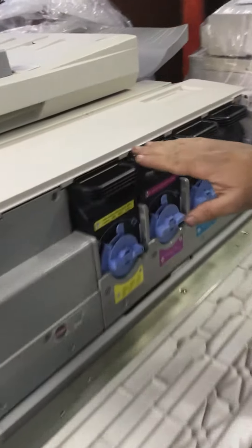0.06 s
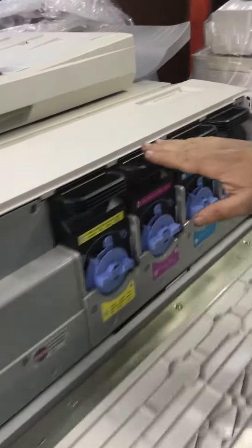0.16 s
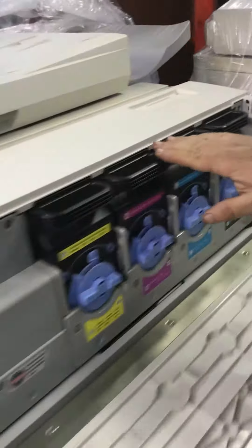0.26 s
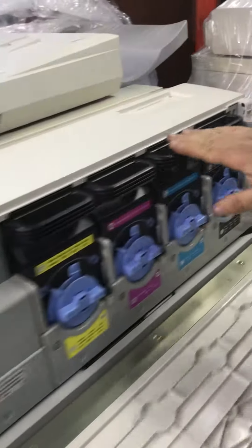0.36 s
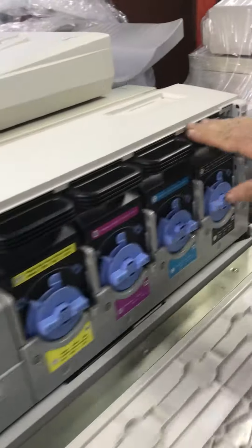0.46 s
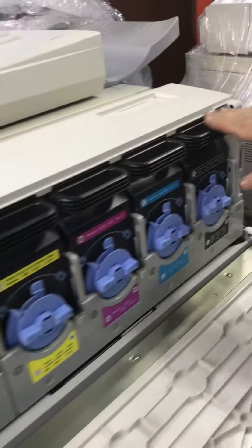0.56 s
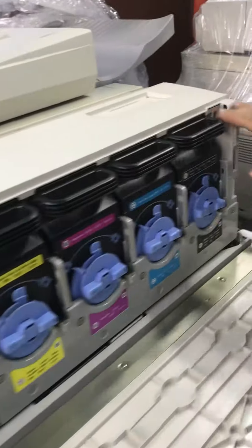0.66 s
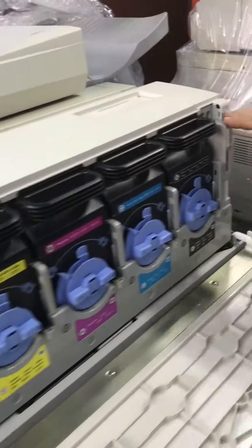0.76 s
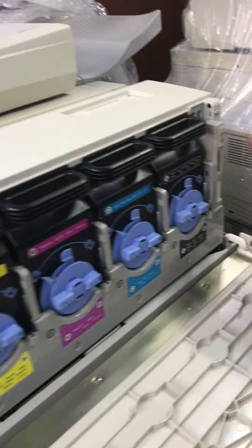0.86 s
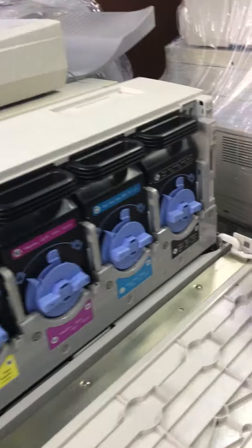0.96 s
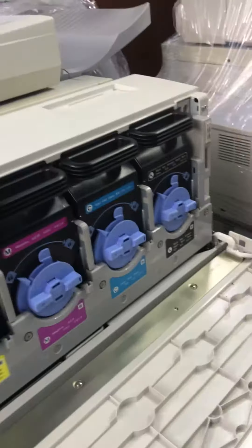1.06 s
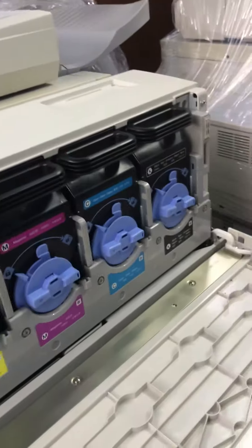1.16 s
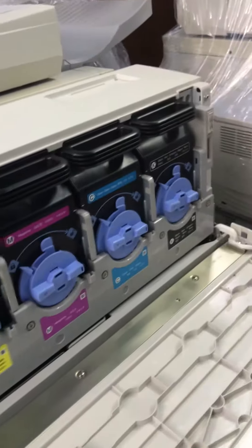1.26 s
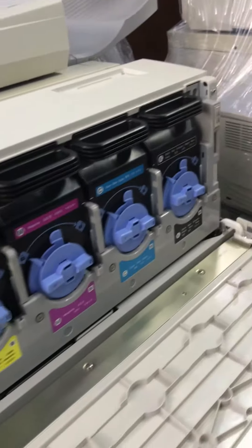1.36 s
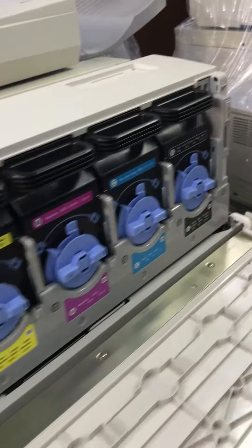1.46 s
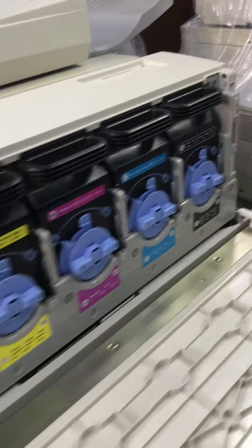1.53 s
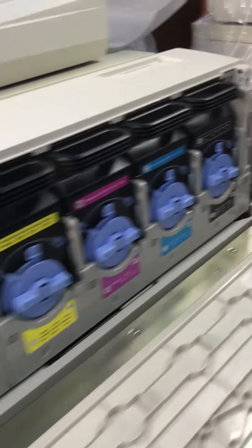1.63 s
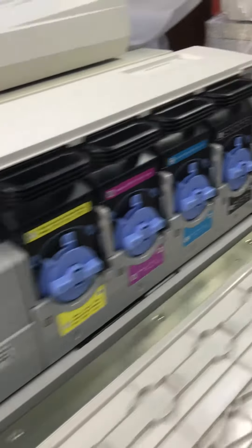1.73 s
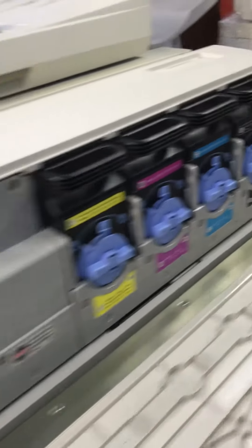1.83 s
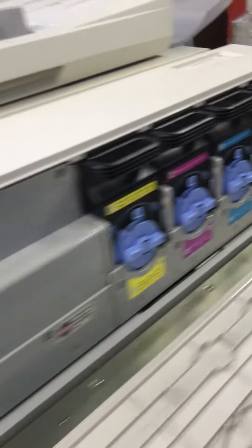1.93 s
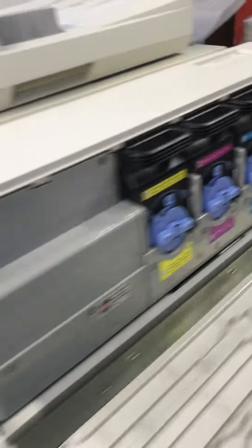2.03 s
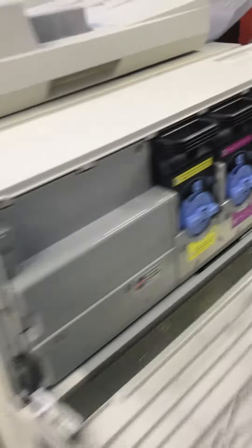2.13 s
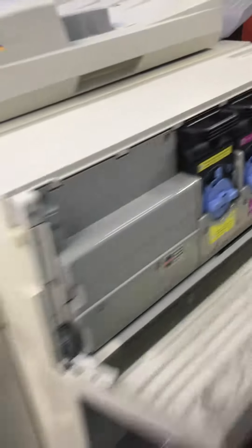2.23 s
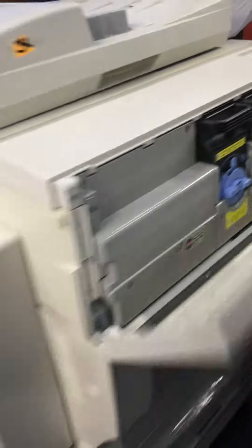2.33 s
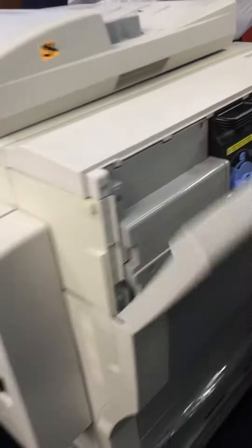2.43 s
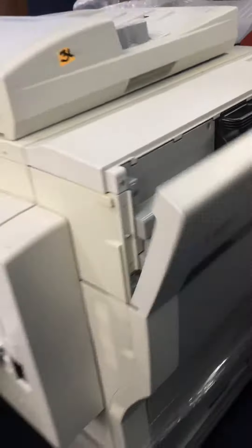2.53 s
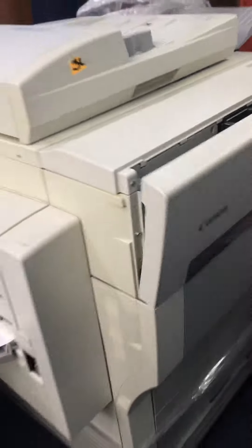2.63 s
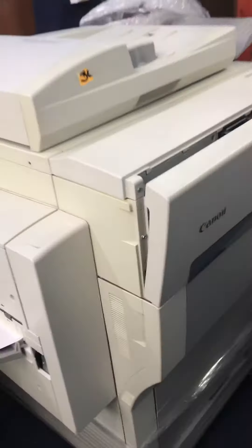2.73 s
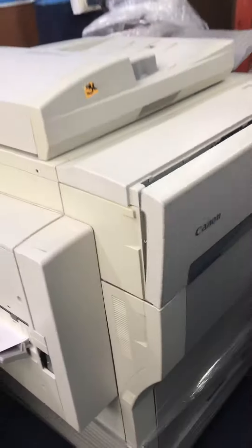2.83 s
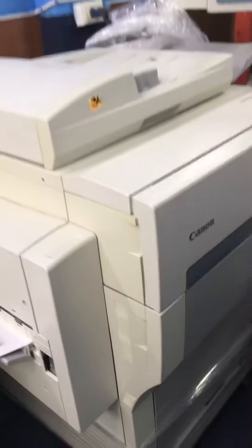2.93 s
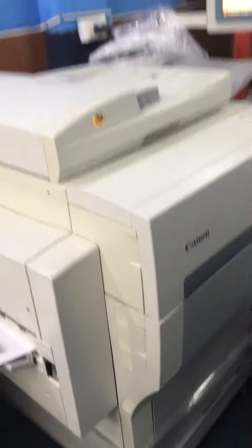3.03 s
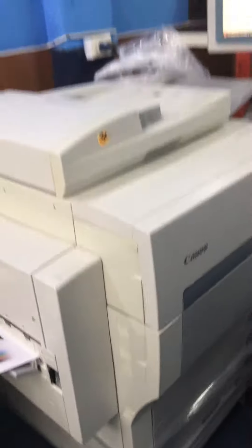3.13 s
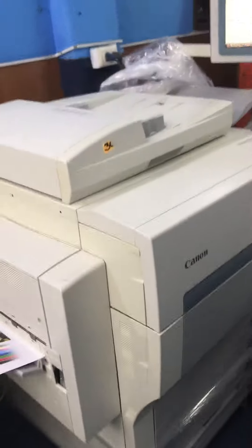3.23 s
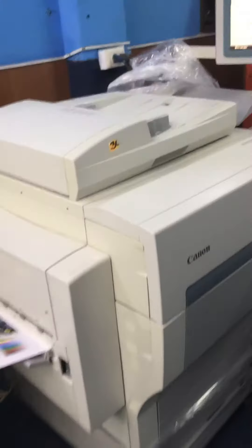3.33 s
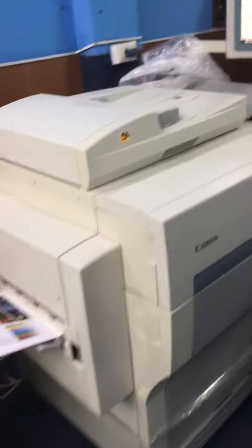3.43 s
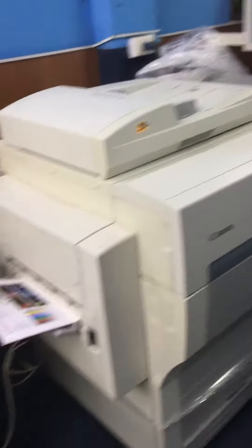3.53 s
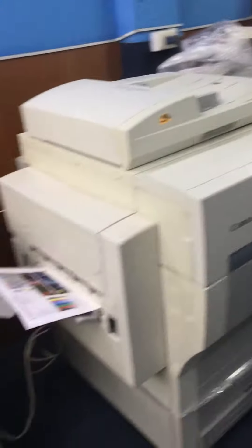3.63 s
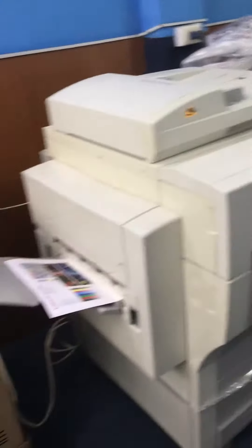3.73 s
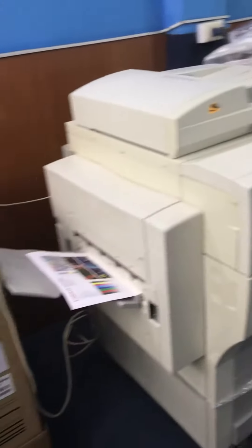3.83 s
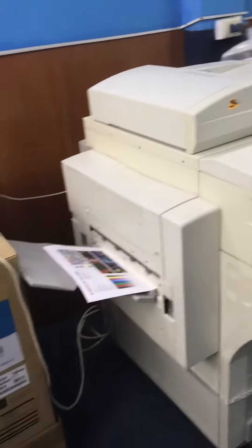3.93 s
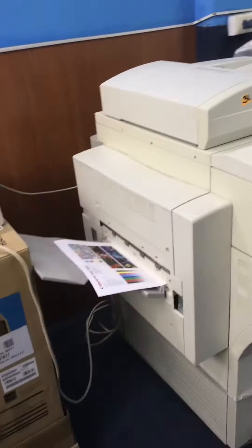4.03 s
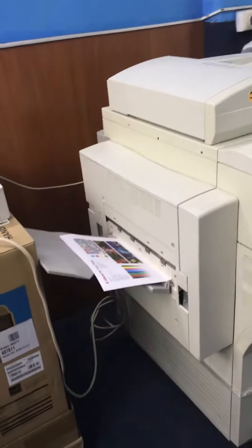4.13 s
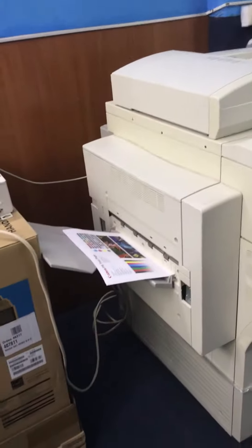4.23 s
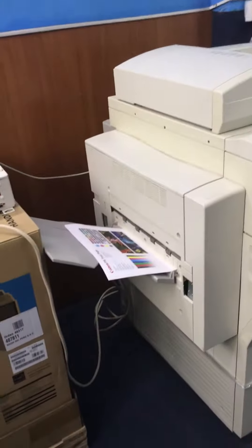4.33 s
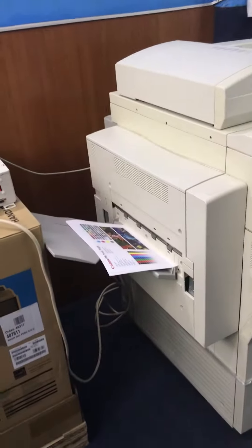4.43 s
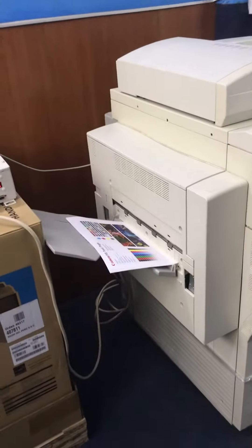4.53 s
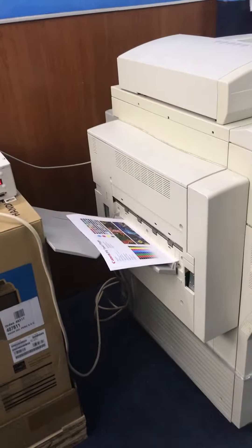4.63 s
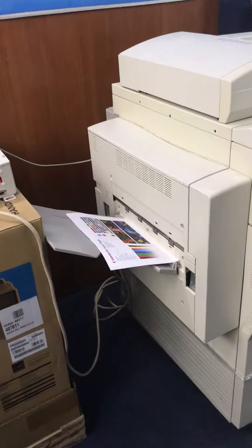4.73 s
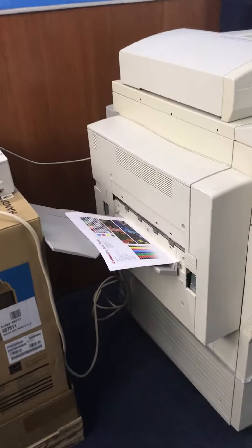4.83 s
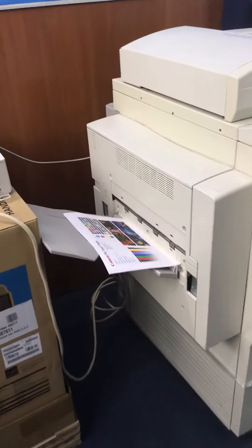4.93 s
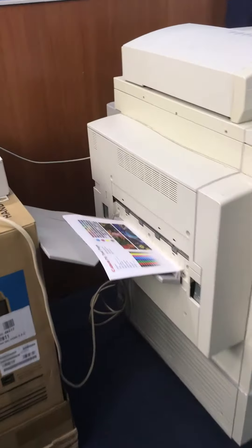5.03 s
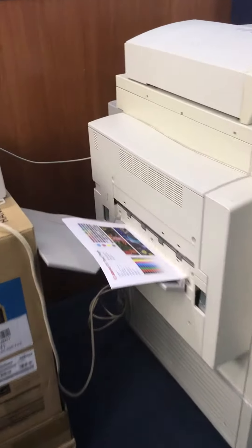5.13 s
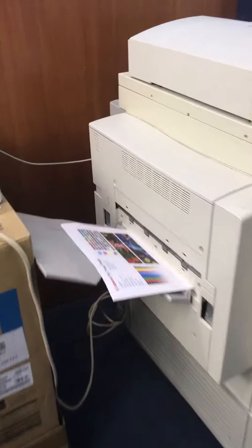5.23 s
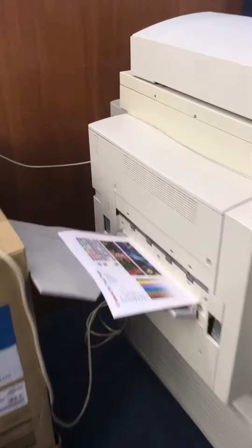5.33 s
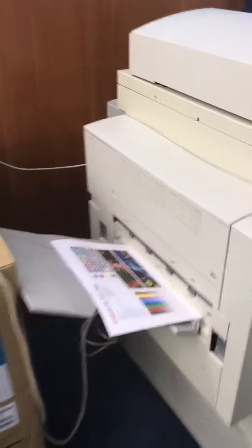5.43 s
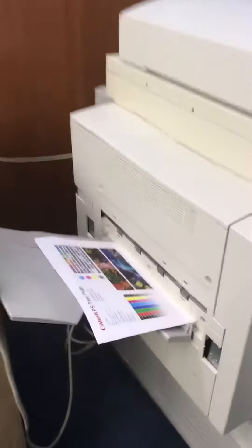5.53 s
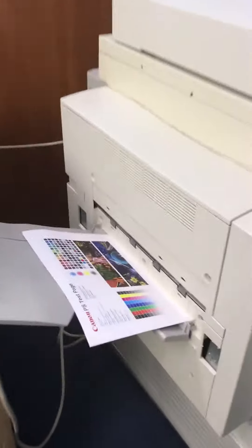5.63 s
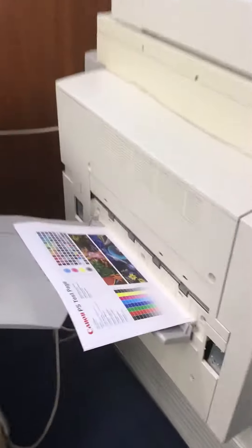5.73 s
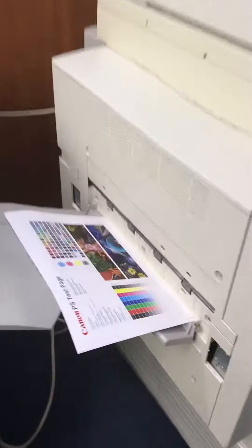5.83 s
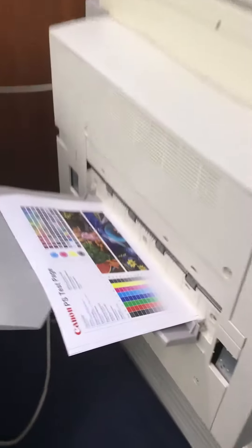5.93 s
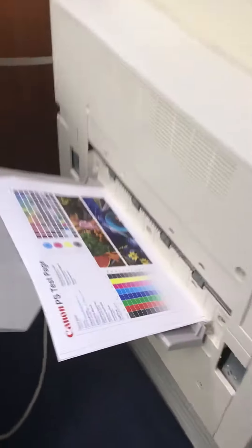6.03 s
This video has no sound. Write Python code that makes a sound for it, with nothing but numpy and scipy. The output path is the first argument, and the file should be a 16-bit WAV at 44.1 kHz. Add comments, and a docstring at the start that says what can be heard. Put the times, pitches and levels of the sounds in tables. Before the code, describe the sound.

Steady fan rush and motor whine from a large printer, with one loud plastic door clack and a few light clicks.

```python
"""Office copier in a small room

Fans rush and hum, rollers hiss, the cabinet drones, motors and gear trains whine. A hand slides off
the toner bay; the plastic front door is knocked, judders on its hinge and is slapped shut on its latch.
The listener moves to the output tray through the tones' standing waves while the paper path clicks."""
import sys
import numpy as np
from scipy import signal
from scipy.fft import rfft, irfft
from scipy.io import wavfile

SR = 44100
rng = np.random.default_rng(int(sys.argv[2]) if len(sys.argv) > 2 else 0)


def to_wav(s):
    """Save 16-bit WAV."""
    ch = np.atleast_2d(s).T  # columns
    pcm = np.round(np.clip(ch, -1, 1) * 32767)  # PCM
    wavfile.write(sys.argv[1], SR, pcm.astype(np.int16))


N = 268569
T = np.arange(N) / SR
RING_T = T[:SR // 2]
MESH_HZ, TWIN_MESH_HZ = 448.3, 445.7


def undb(db):
    """Decibels to gain."""
    return 10 ** (np.asarray(db) / 20)


def unit(x):
    """Scale to rms 1."""
    return x / np.sqrt(np.mean(x ** 2))


def unit_attack(x):
    """Scale to rms 1 over the first 10 ms."""
    return x / np.sqrt(np.mean(x[:SR // 100] ** 2))


def swell(at_s, width_s):
    """Bell curve of height 1."""
    return np.exp(-2 * ((T - at_s) / width_s) ** 2)


def fade(t60_s):
    """Exponential decay."""
    return np.exp(-np.log(1000) * RING_T / t60_s)


def walk(rate_hz):
    """Smooth random drift of rms 1."""
    size = 4096
    hz = np.arange(size // 2 + 1) * SR / N
    coarse = irfft(rfft(rng.standard_normal(size)) * np.exp(-(hz / rate_hz) ** 2), size)
    return np.interp(T, np.linspace(0, T[-1], size), unit(coarse))


def noise(spectrum, peaks=(), size=N):
    """Noise of rms 1: a smooth spectrum plus resonances."""
    hz = np.arange(size // 2 + 1) * SR / size + 1
    knots_hz, knots_db = np.transpose(spectrum)
    shape_db = np.interp(np.log(hz), np.log(knots_hz), knots_db)
    for centre_hz, width_hz, peak_db in peaks:
        shape_db += peak_db / (1 + (2 * (hz - centre_hz) / width_hz) ** 2)
    return unit(irfft(rfft(rng.standard_normal(size)) * undb(shape_db), size))


def band(x, low_hz, high_hz):
    """Causal band-pass."""
    return signal.sosfilt(signal.butter(2, [low_hz, high_hz], "band", fs=SR, output="sos"), x)


def modes(rows):
    """Struck modes of random polarity, attack rms 1."""
    ring = 0
    for hz, db, t60_s in rows:
        ring += rng.choice([-1, 1]) * undb(db) * fade(t60_s) * np.sin(2 * np.pi * hz * RING_T)
    return unit_attack(ring)


def add(out, at_s, x):
    """Mix x into out."""
    start = int(at_s * SR)
    out[start:start + len(x)] += x[:N - start]


def tone(hz, scatter):
    """Direct tone plus reflections that shift as the listener moves; rms 1."""
    phase = 2 * np.pi * np.cumsum(hz) / SR
    return unit((1 + scatter * walk(5.1)) * np.cos(phase) + scatter * walk(5.8) * np.sin(phase))


def reflected_tone(hz):
    """Tone heard by reflections alone, dropping out at the nodes; rms 1."""
    phase = 2 * np.pi * np.cumsum(hz) / SR
    return unit(walk(7) * np.cos(phase) + walk(7) * np.sin(phase))


# t/s, position (0 toner bay, 1 output tray)
LISTENER_PATH = [(1.8, 0), (2.7, 1), (3.8, 1)]

def heard(bay_db, tray_db, lean_db=0):
    """Source gain as the listener goes from bay to tray, then leans in."""
    lean_start_s, lean_takes_s = 5.04, 0.75
    position = np.interp(T, *np.transpose(LISTENER_PATH))
    lean = np.clip((T - lean_start_s) / lean_takes_s, 0, 1)
    return undb(bay_db + (tray_db - bay_db) * position + lean_db * lean)


# f/Hz, density/dB
RUSH_SPECTRUM = [(15, -40), (26, 5), (100, -2.5), (200, 0), (380, -5.5), (600, -3.5), (850, -6),
                 (1300, -6.5), (1800, -14), (2500, -19), (4000, -26.5), (8000, -51)]

def fan_rush():
    """Turbulent air from the fans."""
    return noise(RUSH_SPECTRUM) * heard(-52, -50.5, lean_db=3.5) * undb(0.45 * walk(10.4))


# f/Hz, density/dB
ROLLER_SPECTRUM = [(1500, -0.5), (3000, 7), (4200, 4.5), (6000, 4.5), (7500, 1.5), (9300, 0), (12000, -5.5),
                   (15700, -5.5)]
# f/Hz, width/Hz, gain/dB
ROLLER_RESONANCES = [(3193, 91, 14.7), (5600, 195, 12), (8480, 300, 9.9)]

def roller_hiss():
    """Rollers rub; each gear tooth partly repeats the last, bunching the hiss at the mesh overtones."""
    hz = np.arange(N // 2 + 1) * SR / N
    comb_db = 0.7 * np.cos(2 * np.pi * hz / MESH_HZ)
    rub = noise(ROLLER_SPECTRUM, ROLLER_RESONANCES)
    hiss = unit(irfft(rfft(rub) * undb(comb_db), N))
    return hiss * heard(-59, -55.5, lean_db=3) * undb(0.98 * walk(27))


# t/s, depth/dB, width/s
BLADE_NODES = [(1.05, 8.5, 1.23), (3.55, 5.5, 0.68), (5, 10, 0.24)]

def fan_blades():
    """Blade tone, dipping as the listener crosses nodes of its standing wave."""
    pitch_hz = 636.3 * (1 + 0.0043 * walk(17.2))
    dip_db = sum(db * swell(at_s, width_s) for at_s, db, width_s in BLADE_NODES)
    return tone(pitch_hz, scatter=0.15) * heard(-52, -53.5, lean_db=1.5) * undb(-dip_db)


# t/s, gain/dB, width/s
LOW_SWELLS_AND_THUMPS = [(0.167, 10, 0.096), (2.806, 8, 0.3), (3.08, 12.5, 0.056), (4.08, 6, 0.22),
                         (4.502, 9.5, 0.16), (5.256, 14.5, 0.049), (5.61, 6, .2)]

def cabinet_drone():
    """Low cabinet drone that wavers and swells, with the door's boom and a footfall or handling thump."""
    pitch_hz = 63.3 + 2.59 * walk(14.8)
    boost_db = sum(db * swell(at_s, width_s) for at_s, db, width_s in LOW_SWELLS_AND_THUMPS)
    drone = tone(pitch_hz, scatter=0.16) * heard(-52.5, -53.5, lean_db=11.5)
    return drone * undb(boost_db + 1.6 * walk(8.6))


# f/Hz, bay level/dB, tray level/dB
HUM_LINES = [(122.8, -60, -60), (171.5, -62.5, -75), (232.7, -63, -60), (282, -65, -76), (313.3, -69, -63),
             (566, -60, -67), (760, -72, -69.5), (920, -68, -68), (1288, -71, -98), (1386, -111, -66),
             (1545, -72, -67.5), (1760, -86, -72), (2240, -74, -78)]

def hums():
    """Steady tones of fans and drives."""
    return sum(heard(bay_db, tray_db) * tone(hz * (1 + 0.00218 * walk(11.3)), scatter=0.36)
               for hz, bay_db, tray_db in HUM_LINES)


# t/s, f/Hz, gain/dB, width/s
ANTINODES = [(0.217, 2680, 7, 0.16), (0.96, 3130, 4.5, 0.17), (1.92, 3130, 8, 0.17),
             (2.358, 4483, 12.5, 0.085), (4.104, 2680, 3.5, 0.14), (4.846, 3130, 8.5, .13),
             (5.47, 2680, 5.5, 0.15), (5.476, 4931, 9, .08), (5.85, 8070, 5, 0.15), (6.002, 4931, 4, .08)]

def flare(line_hz, reach_hz=180):
    """Gain of a motor or gear line as the listener crosses its antinodes."""
    return undb(sum(db * swell(at_s, width_s) for at_s, hz, db, width_s in ANTINODES
                    if abs(line_hz - hz) < reach_hz))


# f/Hz, relative bay level/dB, relative tray level/dB
MOTOR_LINES = [(2639, -63, -62), (2663, -64.5, -58.5), (2722, -63, -64.5), (3089, -62, -60.5),
               (3166, -63.5, -71), (3146, -65, -65), (3520, -71, -71.5), (3580, -70.5, -85)]

def motor_whine():
    """Close lines beat; each swells and fades as the listener moves."""
    whine = 0
    for hz, bay_db, tray_db in MOTOR_LINES:
        line = tone(hz * (1 + 0.00161 * walk(35.6)), scatter=0.6)
        waver_db = 1.3 * walk(2.5)
        whine += heard(bay_db, tray_db) * flare(hz) * unit(line * undb(waver_db))
    return whine * heard(-2, -5, lean_db=3)


# harmonic, relative level/dB
MESH_OVERTONES = [(9, -76.5), (10, -67), (11, -64.5), (12, -65.5), (13, -67.5), (14, -73), (15, -77),
                  (16, -79), (17, -94), (18, -66), (19, -81), (20, -87), (21, -71), (22, -97), (23, -73),
                  (24, -78), (26, -81), (34, -83)]
# harmonic, drop at the bay/dB
TRAY_SIDE_OVERTONES = [(11, 6.5), (18, 13), (21, 15), (23, 21)]

def gear_trains():
    """Two nearly matched trains mesh: a comb of overtones each, fluttering with its speed."""
    harmonics, levels_db = np.transpose(MESH_OVERTONES)
    bay_drop_db = dict(TRAY_SIDE_OVERTONES)
    gears = 0
    for mesh_hz, train_db in [(MESH_HZ, 0), (TWIN_MESH_HZ, -8)]:
        speed = 1 + 0.0007 * walk(5) + 0.0006 * walk(40)
        for k in range(9, 35):
            gain = undb(np.interp(k, harmonics, levels_db) + train_db)
            place_gain = heard(-bay_drop_db.get(k, 0), 0) * flare(k * mesh_hz)
            gears += gain * place_gain * reflected_tone(k * mesh_hz * speed)
    return gears * heard(-1.4, -1, lean_db=2)


# f/Hz, density/dB
FINGER_SPECTRUM = [(2000, -24), (4000, -0.5), (7000, 3), (9200, 5), (11000, 1), (14500, 2), (16000, -8)]

def hand_slide():
    """Fingers catch and slip on textured plastic: an uneven high hiss that fades as they lift."""
    lift_s, release_s, level_db = 0.68, 0.23, -58.5
    rub = noise(FINGER_SPECTRUM)
    scrapes = 0
    for low_hz, high_hz in [(2000, 7000), (7000, 11000), (11000, 16500)]:
        scrapes += band(rub, low_hz, high_hz) * undb(2.2 * walk(18))
    contact = np.clip(1 - (T - lift_s) / release_s, 0, 1)
    return unit(scrapes) * contact * undb(level_db + 1.2 * walk(290))


# t/s, level/dB, f/Hz, width/s
SQUEAKS = [(0.347, -59, 9150, 0.032), (0.522, -58, 9500, 0.018), (0.693, -53.5, 4210, 0.014),
           (.75, -54, 9600, 0.012), (2.146, -63, 12800, .005), (2.184, -61, 12500, .015),
           (2.74, -63, 11700, .03), (3.831, -67, 12700, .04), (3.892, -61, 12700, 0.014),
           (5.984, -50.5, 2130, 0.035)]

def squeaks():
    """Brief narrow-band friction of skin, plastic and paper."""
    out = np.zeros(N)
    for at_s, db, hz, width_s in SQUEAKS:
        squeak = unit(band(rng.standard_normal(N), hz * 0.975, hz * 1.025))
        out += undb(db) * squeak * swell(at_s, width_s)
    return out


# t/s, level/dB, low f/Hz, high f/Hz, t60/s
SNAPS = [(2.1484, -43, 1280, 1950, 0.024), (2.148, -45.5, 2700, 12300, 0.021),
         (2.194, -57, 2520, 13000, 0.025), (2.419, -44.5, 895, 7550, 0.046),
         (2.711, -46.5, 6000, 13000, 0.12), (3.0473, -19, 882, 17370, 0.044),
         (3.663, -46.5, 790, 1670, 0.061), (3.683, -47.5, 1300, 1810, 0.02),
         (3.771, -48, 2250, 15100, 0.08), (3.779, -40.5, 2350, 14500, 0.11),
         (4.624, -47, 3500, 15000, 0.15)]

def clicks():
    """Latch, catches and paper-path levers snap."""
    out = np.zeros(N)
    for at_s, db, low_hz, high_hz, t60_s in SNAPS:
        snap = band(rng.standard_normal(len(RING_T)) * fade(t60_s), low_hz, high_hz)
        add(out, at_s, undb(db) * unit_attack(snap))
    return out


# t/s, level/dB, f/Hz
CASING_BUMPS = [(2.49, -44, 353), (2.521, -42, 169), (2.745, -43, 287), (3.056, -29, 251),
                (5.894, -39, 168), (5.91, -35.5, 148), (5.929, -42, 331), (5.961, -37.5, 203)]

def casing_bumps():
    """Dull bumps on the casing: one low mode plus a noisy thud."""
    out = np.zeros(N)
    for at_s, db, hz in CASING_BUMPS:
        thud = band(rng.standard_normal(len(RING_T)), 100, 790) * fade(0.16)
        bump = modes([(hz, 0, 0.09)]) + 0.39 * unit_attack(thud)
        add(out, at_s, undb(db) * bump)
    return out


# f/Hz, level/dB, t60/s
PANEL_MODES = [(84, -8, 0.24), (174, -9, 0.4), (237, -6, 0.15), (270, 3, 0.091), (338, -6, 0.1),
               (576, 1.5, 0.31), (690, 2, 0.11), (787, 14, 0.034), (964, -4, 0.067), (1240, -3, 0.085),
               (1530, -14, 0.077), (1818, 4, 0.1), (2080, -12, 0.049)]
# f/Hz, density/dB
PANEL_SPECTRUM = [(50, -20), (240, 2.5), (450, -2), (720, 3.5), (1500, -2.5), (2500, -6.5), (4500, -7.5),
                  (7000, -25), (15000, -15)]
# t/s, level/dB, cutoff f/Hz
DOOR_BLOWS = [(2.712, -36.5, 7070), (2.72, -37, 3600), (2.727, -36, 3600), (2.733, -35.5, 2580),
              (2.794, -48, 390), (3.0222, -38, 5500), (3.048, -38, 6000), (3.0543, -16, 14000),
              (3.061, -25, 9000), (3.069, -36, 1960), (3.081, -22.5, 2500), (3.106, -27.5, 1480)]

def door_blows():
    """Blows ring the plastic panel; softer contact leaves only its low modes."""
    out = np.zeros(N)
    for at_s, db, cutoff_hz in DOOR_BLOWS:
        dense_ring = noise(PANEL_SPECTRUM, size=len(RING_T)) * fade(0.077)
        ring = unit_attack(dense_ring) + undb(-6.5) * modes(PANEL_MODES)
        add(out, at_s, undb(db) * unit_attack(band(ring, 62, cutoff_hz)))
    return out


# t/s, level/dB
JUDDER_ENVELOPE = [(2.7395, -35), (2.752, -33), (2.775, -36), (2.8, -40), (2.825, -52)]
# f/Hz, level/dB, t60/s
SLIP_MODES = [(96, -11, 0.022), (188, 5, 0.017), (290, 0, 0.018), (408, 0, 0.058), (550, 1.5, 0.062),
              (1060, -2.5, 0.022), (1660, -7.5, 0.043), (2920, -5, 0.016)]

def hinge_judder():
    """The closing door sticks and slips; each slip rings the same panel modes."""
    slip_hz, jitter_s = 88.5, 0.00028
    times_s, levels_db = np.transpose(JUDDER_ENVELOPE)
    ring = modes(SLIP_MODES)
    out = np.zeros(N)
    for at_s in np.arange(times_s[0], times_s[-1], 1 / slip_hz):
        gain = undb(np.interp(at_s, times_s, levels_db))
        add(out, at_s + jitter_s * rng.standard_normal(), gain * ring)
    return out


# f/Hz, level/dB, t60/s
SPRING_MODES = [(1010, -6, .02), (7260, 0, .018), (9860, -4, .012), (14300, -3, .012)]

def latch_spring(at_s=3.046, level_db=-24):
    """The door latch's spring pings right beside the listener."""
    out = np.zeros(N)
    add(out, at_s, undb(level_db) * modes(SPRING_MODES))
    return out


# f/Hz, t60/s
ROOM_DECAY = [(100, 0.53), (500, 0.34), (2000, 0.57), (5000, 0.43), (14000, 0.18)]

def room(x, wet_db, build_s):
    """Add diffuse office reverberation; the top treble dies first."""
    knots_hz, knots_t60_s = np.transpose(ROOM_DECAY)
    tail = 0
    for hz in 50 * 2 ** np.arange(9):
        octave = band(rng.standard_normal(len(RING_T)), hz / np.sqrt(2), hz * np.sqrt(2))
        tail += octave * fade(np.interp(np.log(hz), np.log(knots_hz), knots_t60_s))
    tail *= 1 - np.exp(-(RING_T / build_s) ** 2)
    tail /= np.sqrt(np.sum(tail ** 2))
    return x + undb(wet_db) * signal.fftconvolve(x, tail)[:N]


def scene():
    """Mono mix; knocks, clicks and squeaks excite the room."""
    knocks = room(door_blows() + casing_bumps() + hinge_judder(), wet_db=-13.5, build_s=0.0096)
    ticks = room(clicks() + squeaks(), wet_db=-11.5, build_s=0.018)
    machine = fan_rush() + roller_hiss() + fan_blades() + cabinet_drone() + hums()
    drives = motor_whine() + gear_trains()
    return (machine + drives + hand_slide() + ticks + knocks + latch_spring())[None]


def record(dry):
    """Steep low-pass."""
    cutoff_hz = 15800
    return signal.sosfilt(signal.ellip(10, 0.2, 80, cutoff_hz, fs=SR, output="sos"), dry)


dry = scene()
out = record(dry)
to_wav(out)
```